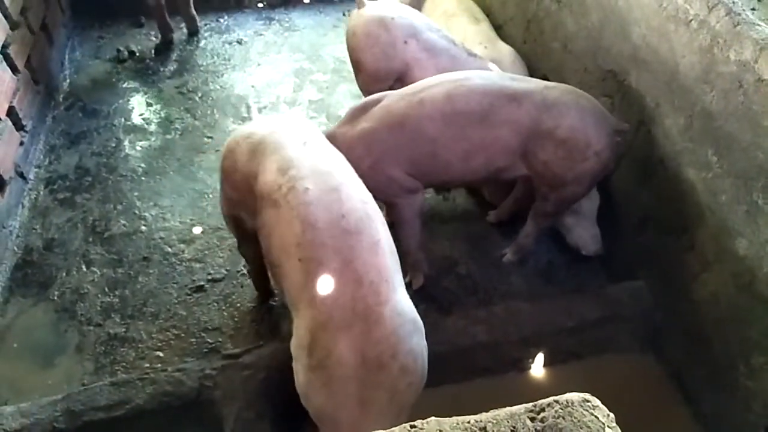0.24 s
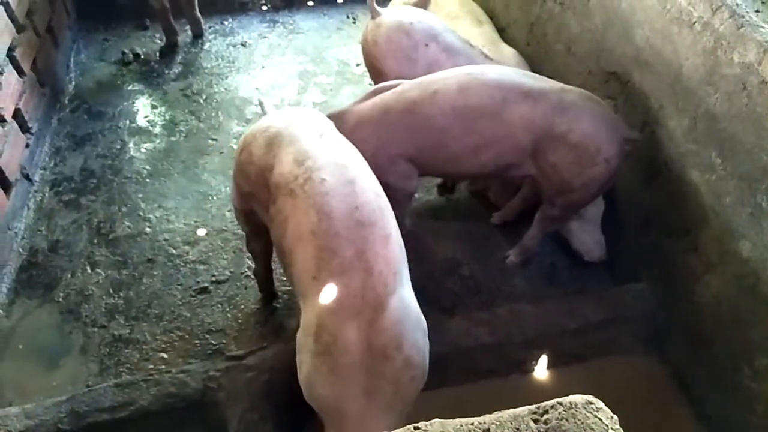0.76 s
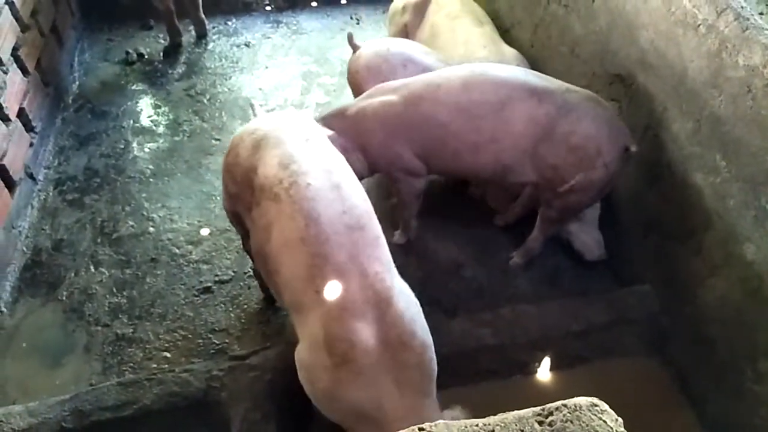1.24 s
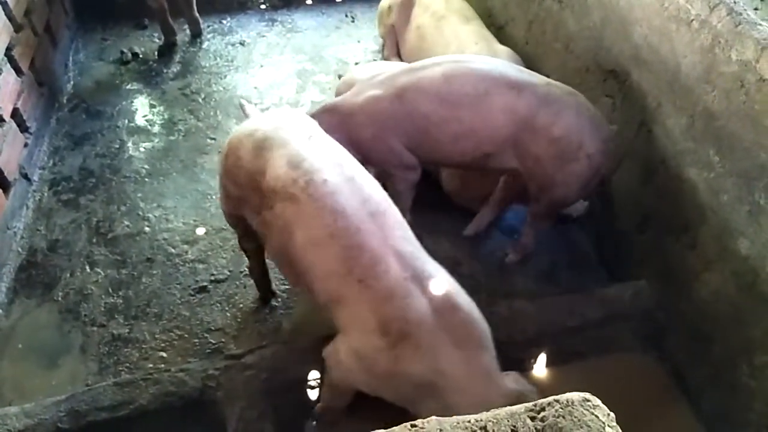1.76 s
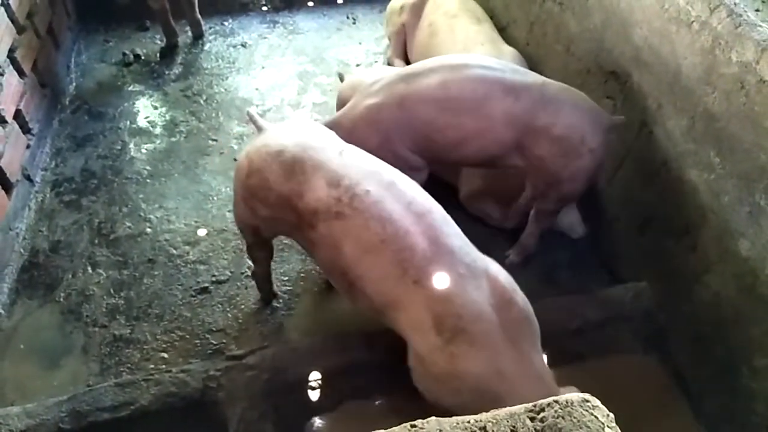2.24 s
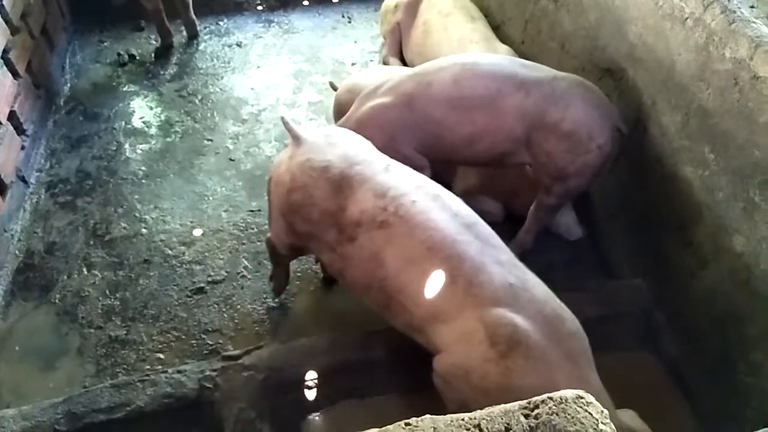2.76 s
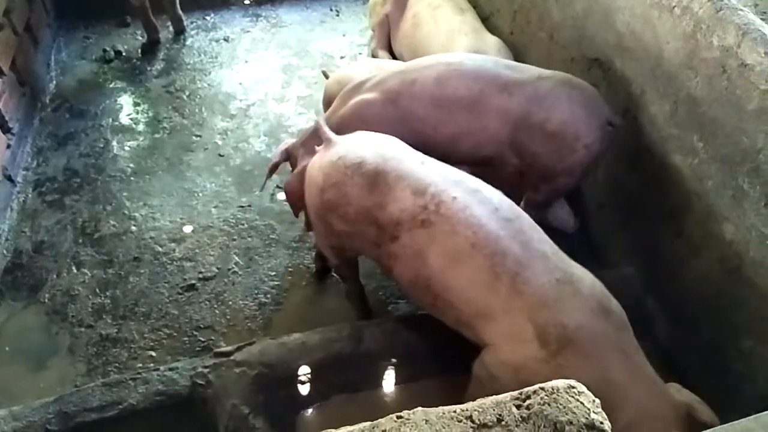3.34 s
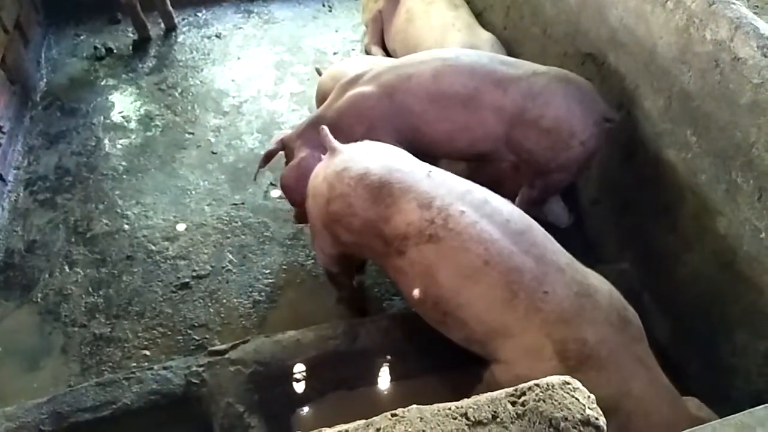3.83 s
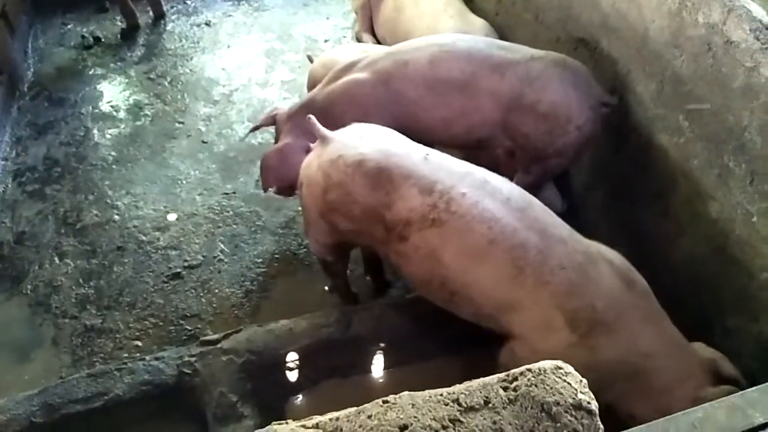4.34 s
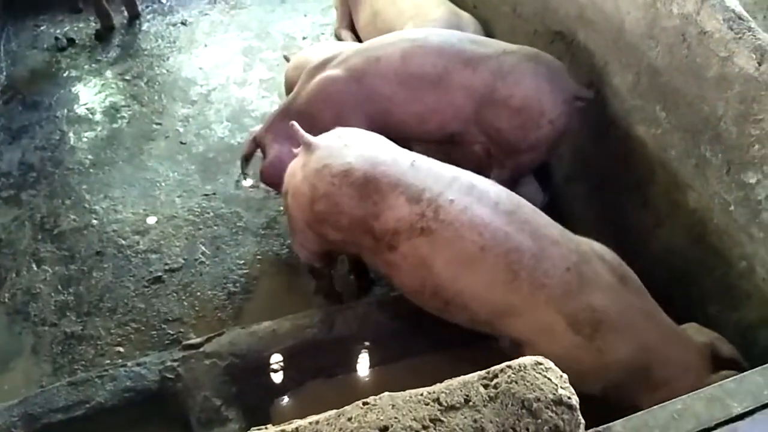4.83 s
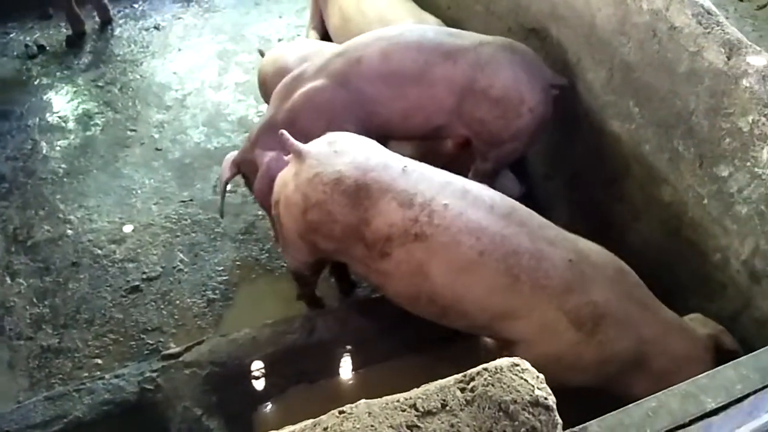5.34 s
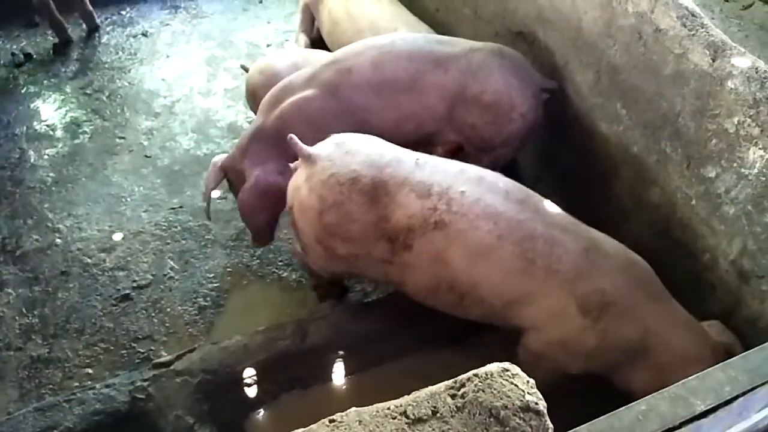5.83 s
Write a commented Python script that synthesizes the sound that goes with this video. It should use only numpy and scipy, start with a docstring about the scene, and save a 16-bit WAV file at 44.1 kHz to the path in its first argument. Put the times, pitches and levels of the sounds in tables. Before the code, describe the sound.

Pigs grunt about once a second while slurping, smacking and squelching in a muddy puddle in a concrete pen.

```python
"""A concrete pen, where pigs root in a muddy puddle a few steps away.
They grunt about once a second, slack tissue flapping through throat and snout, some with a nasal hum.
Between the grunts their mouths suck and smack, bubbles pop, mud squelches and water splashes.
Something of metal, perhaps a drinker valve, squeals thinly now and then. The bare walls ring with
it all, over a bed of low rumble and faint hiss."""
import sys
import numpy as np
from scipy import signal
from scipy.fft import rfft, irfft, next_fast_len
from scipy.io import wavfile
from scipy.ndimage import uniform_filter1d

SR = 44100
rng = np.random.default_rng(int(sys.argv[2]) if len(sys.argv) > 2 else 0)


def log_audio(samples):
    """Write samples as a 16-bit WAV file to the path given in sys.argv[1]."""
    # one column per channel
    frames = np.atleast_2d(samples).T
    # limit to full scale, then quantise
    limited = np.clip(frames, -1, 1)
    pcm = np.round(limited * 32767).astype(np.int16)
    wavfile.write(sys.argv[1], SR, pcm)


N = 268436
TIME = np.arange(N) / SR

# Swells of low rumble. Each row: peak time in seconds, level in dB.
RUMBLE_SWELLS = [(.07, -44), (.306, -53), (.7, -42), (.843, -43), (1.15, -62), (1.616, -49.5), (1.937, -43),
                 (2.196, -54.5), (2.47, -53), (2.59, -49), (3.046, -45), (3.32, -57.5), (4.39, -47),
                 (5.232, -56), (5.835, -64)]
# Tone colours of the rumble and the hiss. Each row: frequency in Hz, gain in dB.
RUMBLE_EQ = [(15, -22), (35, -15.5), (65, 5), (100, -8.5), (150, -15), (300, -31), (900, -87)]
HISS_EQ = [(150, 6.5), (600, 5.5), (2000, 5), (6000, -2), (9500, -7), (13000, -2), (15500, -2.5)]
# The ring of the concrete walls. Each row: frequency in Hz, seconds to die away by 60 dB.
WALL_DECAY = [(100, 0.33), (400, 0.33), (1500, 0.49), (4000, 0.24), (8000, 0.66), (15000, 0.13)]
# Thin metallic squeals. Each row: start and length in seconds, lower and upper tone's gain in dB.
SQUEALS = [(1.83, 0.091, -82, -66.5), (2.182, 0.093, -71, -63), (2.363, 0.025, -64, -58.5),
           (2.68, .054, -60.5, -54.5), (2.835, 0.077, -63, -75), (3.099, 0.05, -60, -70),
           (3.49, 0.059, -71, -64), (3.967, 0.16, -79, -69.5), (4.513, 0.13, -76.5, -94),
           (4.636, 0.033, -65, -57), (5.581, 0.074, -73, -61.5)]
# The metal's partials, a list for the lower tone and one for the upper. Each pair: Hz, gain in dB.
METAL_PARTIALS = [
    [(5757, 10), (10551, -4.5), (13458, -3)],
    [(6680, 2), (7998, -19)],
]
# Spray thrown up by snouts and trotters. Each row: start in seconds, gain in dB, decay in seconds.
SPLASHES = [(1.629, -52, 0.095), (1.689, -53.5, 0.074), (2.135, -52, 0.096), (2.345, -48, 0.015),
            (3.339, -55, 0.03), (4.039, -51.5, 0.032), (4.643, -49.5, 0.04), (4.704, -46, 0.047),
            (4.892, -49, 0.078), (5.06, -58, 0.16), (5.838, -54, 0.24)]
# Tone colour of the spray. Each row: frequency in Hz, gain in dB.
SPRAY_EQ = [(1500, -37), (3500, 5), (5500, 1), (7500, -14.5), (9500, -18.5), (12500, -10), (15500, -16)]
# Pockets in the mud. Each row: resonance in Hz, gain in dB.
MUD_POCKETS = [(850, 2), (1400, -3.5), (2150, 7.5), (3100, -1.5)]
# Bubbles bursting at the lips. Each row: peak time in seconds, gain in dB, pitch in Hz.
POPS = [(1.245, -36, 1920), (2.134, -28.5, 826), (2.202, -30.5, 970), (3.021, -36.5, 4330),
        (3.665, -42.5, 810), (4.714, -31.5, 2210), (4.751, -31.5, 1104), (5.5, -43, 2610),
        (5.523, -31, 2330)]
# Air sucked through the wet snout. Each row: start and length in seconds, gain in dB,
# resonance in Hz, glide in octaves.
SUCKS = [ (0.453, 0.11, -63.5, 4670, 0), (0.392, .12, -60.5, 3190, 0), (0.466, 0.096, -52, 2490, 0.56),
         (.48, 0.14, -55.5, 951, 0.38), (.572, 0.076, -44, 2797, -0.16), (.83, .12, -57, 3015, 0.069),
         (0.959, 0.11, -51, 2370, 0.73), (1.02, 0.16, -62, 892, 0), (1.053, .055, -57, 4420, -0.011),
         (1.091, 0.11, -53.5, 2088, 0.11), (1.134, 0.12, -59.5, 2990, 0.011),
         (1.385, 0.26, -56.5, 1330, .25), (1.437, 0.17, -49.5, 2260, 0.33),
         (1.581, .17, -51.5, 2010, -0.34), (1.602, .17, -49.5, 1041, 0.336),
         (2.366, 0.21, -56.5, 1214, 0.408), (2.435, 0.075, -56, 2640, -.2),
         (2.925, 0.069, -51.5, 4560, -.1), (3.028, .1, -59, 3130, -0.13), (3.852, .13, -54.5, 1464, -0.127),
         (4.081, .15, -57.5, 658, 0), (4.06, 0.3, -55, 1251, 0.246), (4.117, 0.13, -54.5, 2040, 0),
         (4.22, 0.11, -46, 2490, 0.28), (4.226, 0.086, -58.5, 5970, 0.035),
         (4.446, 0.33, -55.5, 1255, -0.097), (4.478, 0.21, -56, 2365, 0.57), (4.766, .14, -56, 4700, 0.2),
         (5.174, 0.13, -67, 1876, 0.095), (5.283, 0.13, -64, 3690, 0), (5.55, .072, -65, 2680, 0.264),
         (5.808, 0.12, -49.5, 3340, -0.22), (5.932, .2, -53, 2567, -0.375), (5.936, .17, -54, 4390, -0.15)]
# Wet lip and tongue smacks. Each row: start in seconds, gain in dB, mouth resonance in Hz, upper
# resonance against the lower in dB, width as a share of frequency, rise and decay in seconds.
SMACKS = [ (.377, -57, 822, -16, 0.18, 0.0024, 0.12), (1.243, -37.5, 951, -0.5, 0.46, 0.0024, .02),
          (1.245, -46.5, 1900, 5, 0.52, 0.0051, 0.067), (1.683, -45.5, 2833, -40, 0.55, 0.012, 0.073),
          (1.998, -47, 2244, -4.5, 0.75, 0.0062, 0.079), (2.125, -44, 828, 3, 0.71, 0.0019, 0.066),
          (2.198, -36.5, 1660, -39, 0.25, 0.0034, 0.017), (2.228, -46, 1954, -5, 0.59, 0.005, 0.065),
          (2.265, -44.5, 2122, -18, 0.36, 0.007, 0.04), (2.34, -45.5, 1357, 0, 0.41, .02, 0.028),
          (2.732, -41, 725, 11, 1, 0.0062, 0.014), (2.82, -40.5, 2624, -4.5, 0.27, 0.0027, 0.044),
          (2.893, -33, 1849, -18.5, 0.56, 0.0056, 0.017), (2.921, -40, 1155, -3, 0.44, 0.0063, 0.024),
          (3.017, -48, 4340, -37, 0.12, 0.0035, 0.03), (3.577, -50, 1470, -29, 0.55, 0.0029, .019),
          (3.622, -42.5, 1660, 6, .94, 0.0048, 0.055), (3.65, -40, 814, -9, 0.334, 0.01, 0.009),
          (3.772, -45, 1606, -6, 0.36, 0.0045, 0.0085), (4.02, -44.5, 1076, 3.5, .85, 0.005, 0.082),
          (4.641, -34, 1723, 4, 0.61, 0.0078, 0.028), (4.708, -35.5, 2264, -32, 0.48, 0.0062, 0.01),
          (4.748, -36.5, 1447, 0.5, .41, 0.0025, 0.021), (4.904, -39.5, 1148, 9.5, .46, 0.026, 0.023),
          (5.007, -45, 2530, -12, .73, 0.0026, 0.038), (5.493, -42, 2398, -9, 0.129, 0.0037, 0.053),
          (5.641, -38, 2880, -42, 0.27, 0.0024, 0.056), (5.924, -44, 1281, 9.5, 1, 0.0089, 0.045)]
# The clean nasal hum inside some grunts. Each row: start, length and time to peak in seconds,
# level in dB, pitch in Hz.
HUMS = [(2.524, 0.093, .089, -21.5, 246.6), (2.645, .075, 0.029, -40, 254),
        (3.327, 0.177, 0.078, -32.5, 343.4), (5.651, 0.081, 0.029, -32, 408.4),
        (5.683, 0.15, 0.028, -30.5, 240.6)]
# Short closed-mouth grunts. Each row: start and length in seconds, level in dB, throat resonance in Hz.
SOFT_GRUNTS = [(0.457, 0.22, -48.5, 337), (0.864, 0.055, -53, 378), (1.089, 0.082, -59, 201),
               (1.287, 0.1, -58, 355), (1.265, 0.15, -58, 660), (1.577, 0.047, -47, 187),
               (3.613, 0.0518, -64, 486), (4.01, 0.061, -55, 295), (4.222, .08, -49, 328)]
# Tone colour of air rushing out of the nose. Each row: frequency in Hz, gain in dB.
NOSTRIL_EQ = [(500, -31), (2000, -9), (6500, -7), (9000, -26), (15000, -28)]
# Throat and snout resonances, one list a grunt. Each entry: centre and width in Hz, gain in dB.
THROATS = [
    [(188, 174, 4.5), (396, 104, 6.5), (890, 570, -7), (1512, 150, -2.5), (2390, 1550, -11.5),
     (3290, 330, -8), (4460, 1500, -21)],
    [(164, 65, 1), (332, 195, 2.5), (887, 460, 1), (1475, 245, 1.5), (2350, 630, 1.5), (2960, 820, 0),
     (3470, 150, -8)],
    [(179, 63, 11.5), (319, 170, 11), (1010, 800, -9), (1550, 150, -5.5), (2510, 400, -7), (2875, 430, -8),
     (5000, 870, -36)],
    [(117, 56, -5.5), (264.6, 67, -0.5), (580, 360, -13.5), (786, 170, -4), (1290, 170, -8),
     (2180, 780, -9), (3274, 740, -4), (4880, 790, -20)],
    [(334, 98, 0), (896, 150, -11.5), (1810, 160, -15), (2230, 390, -7.5), (3370, 670, -8.5),
     (3690, 260, -6), (4860, 1250, -18.5)],
    [(225, 100, 12), (368, 115, 10.5), (1110, 290, 2), (1500, 510, 2.5), (2410, 660, 5), (2853, 120, 8.5),
     (5000, 1000, -11.5)],
    [(360, 210, 15), (630, 89, 17), (905, 370, 6), (1600, 110, 12.5), (2070, 910, 5), (3090, 240, 1),
     (4970, 1600, -5.5)],
    [(230, 61, 11), (432, 190, 8.5), (955, 270, -7.5), (1374, 160, -3), (2470, 1370, -10.5),
     (2770, 210, -6.5), (4550, 330, -21)],
]
# Full grunts. Each row: start, length, time to chest peak and time to rasp peak in seconds,
# chest gain, rasp gain and swell up to the peak in dB, flaps per second, roughness (capped at 1).
GRUNTS = [ (0, .24, 0.12, 0.089, -32, -32.5, 4.5, 108, 0.62),
          (.592, .21, 0.097, 0.098, -28.5, -28.5, 16, 88.4, 0.55),
          (1.753, 0.25, 0.097, 0.095, -32.5, -32.5, 13, 91, 0.57),
          (2.543, 0.16, 0.047, 0.027, -26, -30, 5, 45, 1.02),
          (3.345, 0.11, 0.044, 0.038, -28.5, -29.5, 19, 59.7, .75),
          (4.285, .165, .06, 0.018, -38, -33, 5, 105, .55),
          (5.034, .13, 0.036, 0.047, -42, -39, 12.5, 96, 0.59),
          (5.675, .19, 0.073, 0.03, -30, -28, 13.5, 117, 0.16)]


def amp(db):
    """Decibels to gain."""
    return 10 ** (np.asarray(db) / 20)


def unit_rms(x):
    """Scales to rms 1."""
    return x / np.sqrt(np.mean(x ** 2) + 1e-20)


def levelled(x, size=1500):
    """Rides the rms to 1 over a window of size samples, keeping the fine grain."""
    return x / np.sqrt(abs(uniform_filter1d(x ** 2, size)) + 1e-20)


def curve_at(points, hz):
    """Reads a curve on a log-frequency axis."""
    point_hz, value = np.transpose(points)
    return np.interp(np.log(hz + 1), np.log(point_hz + 1), value)


def add(mix, start, sound):
    """Lays a sound into the mix at start seconds."""
    part = mix[max(round(start * SR), 0):][:len(sound)]
    part += sound[:len(part)]


def equalised(x, eq):
    """Shapes x with an EQ curve of (Hz, dB) points, at rms 1."""
    size = next_fast_len(len(x))
    gain = amp(curve_at(eq, np.fft.rfftfreq(size, 1 / SR)))
    return unit_rms(irfft(rfft(x, size) * gain, size)[:len(x)])


def resonate(x, hz, width_hz):
    """A steep resonance of gain 1 that may glide."""
    carrier = np.exp(2j * np.pi * np.cumsum(hz * np.ones(len(x))) / SR)
    r = np.exp(-np.pi * width_hz / SR)
    baseband = signal.lfilter([(1 - r) ** 2], [1, -2 * r, r * r], x / carrier + 1e-18)
    return 2 * (carrier * baseband).real


def wander(n, size):
    """Smooth random drift of rms 1 that changes over about size samples."""
    return unit_rms(uniform_filter1d(uniform_filter1d(rng.standard_normal(n), size), size))


def burst(rise, decay, lead=.03):
    """The pre-roll in seconds, and an envelope that swells out of nothing to 1 and dies away."""
    t = np.arange(-lead, rise + 6 * decay, 1 / SR) - rise
    return lead, np.exp(np.minimum(t / (.5 * rise + 0.002), -t / decay))


def background(rumble_floor_db=-68, swell_s=0.058, hiss_db=-64):
    """The bed: low rumble that comes and goes, and a faint steady hiss."""
    swells = sum(amp(db) * np.exp(-((TIME - peak) / swell_s) ** 2) for peak, db in RUMBLE_SWELLS)
    rumble = levelled(equalised(rng.standard_normal(N), RUMBLE_EQ), size=2000)
    hiss = equalised(rng.standard_normal(N), HISS_EQ)
    return rumble * (amp(rumble_floor_db) + swells) + amp(hiss_db) * hiss


def wall_echo(send, predelay_s=0.004, build_s=0.0064):
    """Echoes of the concrete walls: sparse taps, each band dying at its own speed."""
    taps = rng.choice([-1., 1.], SR) * (rng.random(SR) < 2500 / SR)
    hz, t, bands = signal.stft(taps, SR, nperseg=256)
    decay = amp(-60 * t / curve_at(WALL_DECAY, hz)[:, None])
    tail = signal.istft(bands * decay, SR, nperseg=256)[1][:SR]
    tail *= np.clip((TIME[:SR] - predelay_s) / build_s, 0, 1)
    return signal.fftconvolve(send, tail / np.linalg.norm(tail))[:N]


def squeal(start, length, lower_db, upper_db, sag_db=5, waver=0.0066):
    """Metal sings on a few partials that waver together, starting abruptly and sagging in level."""
    n = int(length * SR)
    wavering_time = np.cumsum(1 + waver * wander(n, size=120)) / SR
    tone = sum(amp(tone_db + db) * np.sin(2 * np.pi * hz * wavering_time)
               for tone_db, partials in zip((lower_db, upper_db), METAL_PARTIALS) for hz, db in partials)
    sag = amp(-sag_db * np.linspace(0, 1, n))
    return start, np.sqrt(2) * tone * sag * signal.windows.tukey(n, .1)


def crackle(n, per_s, spread_db, air):
    """Tiny films of water snapping, unequal in size, over a share of rushing air."""
    snaps = (rng.random(n) < per_s / SR) * rng.choice([-1, 1], n)
    sizes = amp(spread_db * np.minimum(rng.exponential(1, n), 4))
    return unit_rms(snaps * sizes) + air * rng.standard_normal(n)


def splash(start, db, decay, rise_share=0.15, clumps_db=3.0):
    """A shower of fine droplets that land in clumps."""
    lead, envelope = burst(rise_share * decay, decay)
    drops = equalised(crackle(len(envelope), per_s=4100, spread_db=1.5, air=0.57), SPRAY_EQ)
    clumps = amp(clumps_db * wander(len(envelope), size=200))
    return start - lead, amp(db) * envelope * unit_rms(drops * clumps)


def gurgle(n, hz, width_hz, air, ring_cycles=40, per_s=50, count=10):
    """Bubbles of a few sizes ring again and again over rushing air, all inside one resonance."""
    ringing = np.zeros(n)
    centre_hz = np.mean(hz)
    for detune in (np.arange(count) + rng.random(count)) / count - .5:
        pitch = min(centre_hz * np.exp(detune * min(width_hz / centre_hz, 1)), SR / 3)
        r = np.exp(-pitch / ring_cycles / SR)
        kicks = (rng.random(n) < per_s / SR) * rng.standard_normal(n)
        kicks[0] = rng.standard_normal()
        ringing += signal.lfilter([1], [1, -2 * r * np.cos(2 * np.pi * pitch / SR), r * r], kicks + 1e-18)
    rush = resonate(rng.standard_normal(n), hz, width_hz)
    return unit_rms(resonate(unit_rms(ringing) + air * unit_rms(rush), hz, 2 * width_hz))


def mud_squelch(mouths, relative_db=-15, follow=0.75, lumpy_db=5, width_share=0.23):
    """Mud squelches on while the snouts are busy, each pocket swelling in its own time."""
    mouth_power = uniform_filter1d(uniform_filter1d(mouths ** 2, 9000), 5000)
    busy = unit_rms(abs(mouth_power) ** (follow / 2))
    pockets = np.zeros(N)
    for hz, db in MUD_POCKETS:
        bubbles = gurgle(N, hz, width_share * hz, air=0.3, per_s=30, count=6)
        lumps = amp(lumpy_db * wander(N, size=2200))
        pockets += amp(db) * unit_rms(bubbles * lumps)
    return amp(relative_db) * np.std(mouths) * busy * unit_rms(pockets)


def pop(peak, db, hz, ring_s=.002, chirp=0.023):
    """A bubble swells and bursts, its pitch rising a little."""
    t = np.arange(-4 * ring_s, 4 * ring_s, 1 / SR)
    tone = np.sin(2 * np.pi * hz * t * (1 + chirp * t / ring_s))
    return peak - 4 * ring_s, amp(db) * tone / np.cosh(t / ring_s) ** 2


def suck(start, length, db, hz, glide):
    """Air and water drawn through a gap whose resonance glides as the mouth moves."""
    n = int(length * SR)
    sweep_hz = hz * 2 ** (glide * np.linspace(-.5, .5, n))
    width_hz = (0.1356 + 0.676 * abs(glide)) * hz  # a mouth that moves more opens wider
    slurp = gurgle(n, sweep_hz, width_hz, air=0.98, count=5)
    return start, amp(db) * levelled(slurp) * signal.windows.tukey(n, .7)


def sips(per_s=4, length=0.11, gain_db=-58, low_hz=2240, high_hz=5630, glide_octaves=.03):
    """Rows of faint sucks at a loose, steady pace, each with its own pitch and glide."""
    rows = []
    for slot, (late, pitch, direction) in enumerate(rng.random((int(per_s * N / SR), 3))):
        hz = low_hz * (high_hz / low_hz) ** pitch
        rows.append(((slot + late) / per_s, length, gain_db, hz, glide_octaves * (2 * direction - 1)))
    return rows


def smack(start, db, hz, upper_db, width_share, rise, decay, upper_ratio=2.05, spatter_db=-13):
    """Wet lips part: a dying gurgle in two resonances of the mouth, with a little spatter."""
    lead, envelope = burst(rise, decay)
    n, upper_hz = len(envelope), upper_ratio * hz
    lower = gurgle(n, hz, width_share * hz, air=.45)
    upper = gurgle(n, upper_hz, width_share * upper_hz, air=.45)
    spatter = unit_rms(resonate(crackle(n, per_s=650, spread_db=-0.5, air=0.11), hz, hz))
    mouth = lower + amp(upper_db) * upper + amp(spatter_db) * spatter
    return start - lead, amp(db) * levelled(mouth, size=700) * envelope


def effort(t, peak, swell_db, fade_db=19):
    """One push of the chest in dB: it swells to 0 at time peak, then fades to the end."""
    before = np.clip(1 - t / peak, 0, 1)
    after = np.clip((t - peak) / max(t[-1] - peak, 1 / SR), 0, 1)
    return -swell_db * before ** 1.19 - fade_db * after ** 0.75  # the powers bend rise and fall


def hum(start, length, peak, db, hz, glide_octaves=0.13, waver=0.022, octave_db=-15):
    """A near-pure nasal tone with a weak octave; it creeps up in pitch, swelling and fading in one push."""
    t = np.arange(0, length, 1 / SR)
    push_db = effort(t, peak, swell_db=17.5)
    pitch = hz * 2 ** (glide_octaves * (t / length - .5)) * (1 + waver * wander(len(t), size=300))
    phase = 2 * np.pi * np.cumsum(pitch) / SR
    tone = unit_rms(np.sin(phase) + amp(octave_db) * np.sin(2 * phase))
    return start, tone * amp(db + push_db) * signal.windows.tukey(len(t), .06)


def soft_grunt(start, length, db, hz, width_hz=130, flaps_per_s=110, jitter=0.312):
    """Uneven flaps heard through a single low resonance of the throat."""
    n = int(length * SR)
    cycles = np.cumsum(flaps_per_s * np.exp(jitter * wander(n, size=250))) / SR
    knocks = np.diff(cycles.astype(int), prepend=-1)
    return start, amp(db) * levelled(resonate(knocks, hz, width_hz)) * signal.windows.tukey(n, .5)


def formant(x, hz, width_hz):
    """A steep-sided resonance of the throat, with dark valleys around it."""
    stage_width = np.sqrt(2) * width_hz
    return resonate(resonate(x, hz, stage_width), hz, stage_width)


def grunt(start, length, chest_peak, rasp_peak, chest_db, rasp_db, swell_db, flaps_per_s, rough, throat,
          split_hz=700, chest_trim_db=-2.0, rasp_trim_db=-1.5, nostril_db=-30):
    """Slack tissue flaps unevenly; each flap sends a knock and a puff of air through throat and snout."""
    t = np.arange(0, length, 1 / SR)
    chest_push = chest_db + chest_trim_db + effort(t, chest_peak, swell_db)
    rasp_push = rasp_db + rasp_trim_db + effort(t, rasp_peak, swell_db)
    rough = np.clip(rough, 0, 1)
    cycles = np.cumsum(flaps_per_s * np.exp(rough * wander(len(t), size=250))) / SR
    flap = cycles.astype(int)
    strength = amp(3 * rng.standard_normal(SR)[flap])  # each flap has its own weight
    airflow = .25 + np.exp(-(cycles % 1) / .45)
    knocks = unit_rms(np.diff(flap, prepend=0) * strength)
    puffs = unit_rms(airflow * strength * rng.standard_normal(len(t)))
    # the jaw opens with effort and lifts the resonances
    jaw = 1 + 0.0044 * (chest_push - chest_push.mean()) + 0.033 * wander(len(t), size=1200)
    # the chest takes more of the knocks, the snout more of the air
    chest_drive = (1 - rough ** 2) * knocks + rough ** 2 * puffs
    snout_drive = (1 - rough) * knocks + rough * puffs
    chest = sum(amp(db) * resonate(chest_drive, hz * jaw, width)
                for hz, width, db in throat if hz < split_hz)
    snout = sum(amp(db) * formant(snout_drive, hz * np.sqrt(jaw), width)
                for hz, width, db in throat if hz >= split_hz)
    rasp = levelled(snout, size=800) + amp(nostril_db) * equalised(puffs, NOSTRIL_EQ)
    voice = levelled(chest) * amp(chest_push) + rasp * amp(rasp_push)
    return start, voice * signal.windows.tukey(len(t), .03)


def scene():
    """Voices, hums, wet sounds and metal, each bus with its own send to the walls, over the bed."""
    voices, hums, wet, metal = np.zeros((4, N))
    for row, throat in zip(GRUNTS, THROATS):
        add(voices, *grunt(*row, throat))
    for bus, source, rows in ((voices, soft_grunt, SOFT_GRUNTS), (hums, hum, HUMS)):
        for row in rows:
            add(bus, *source(*row))
    for source, rows in ((smack, SMACKS), (suck, SUCKS + sips()), (pop, POPS), (splash, SPLASHES)):
        for row in rows:
            add(wet, *source(*row))
    for row in SQUEALS:
        add(metal, *squeal(*row))
    wet = amp(3.5) * wet + mud_squelch(wet)
    echo = wall_echo(amp(-1.5) * voices + amp(-5.5) * hums + amp(-6.0) * wet + amp(-5) * metal)
    return (voices + hums + wet + metal + echo + background())[None]


def record(dry):
    """A steep high cut at 15750 Hz takes the very top off the mix."""
    high_cut = signal.firwin(511, 15750, window=("kaiser", 9), fs=SR)
    return signal.oaconvolve(dry, high_cut[None], "same")


dry = scene()
out = record(dry)
log_audio(out)
```